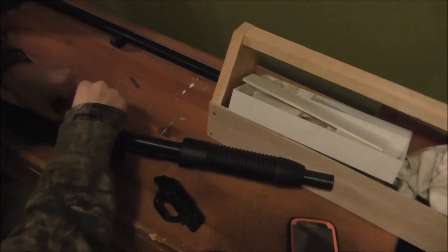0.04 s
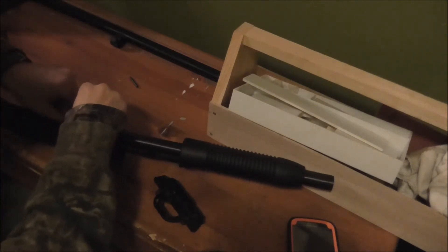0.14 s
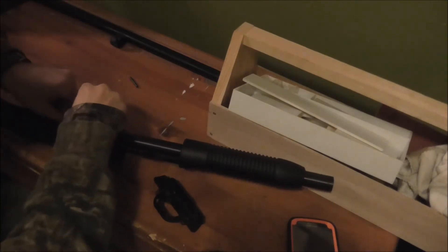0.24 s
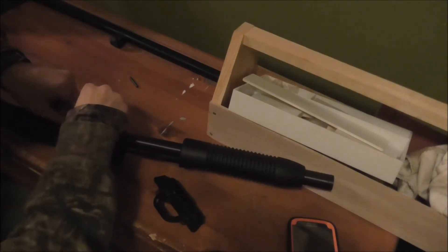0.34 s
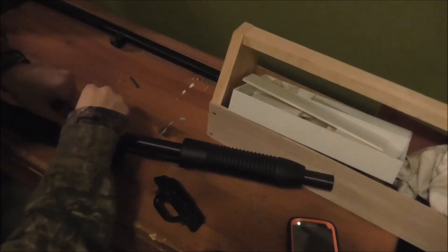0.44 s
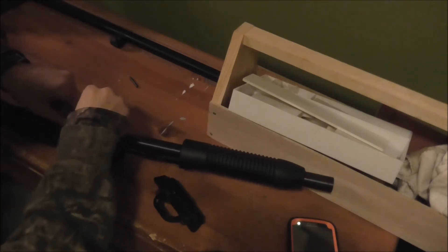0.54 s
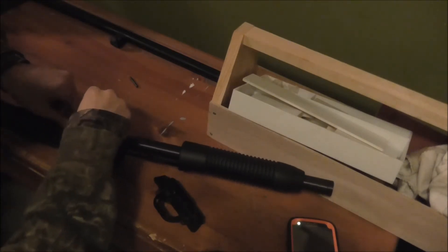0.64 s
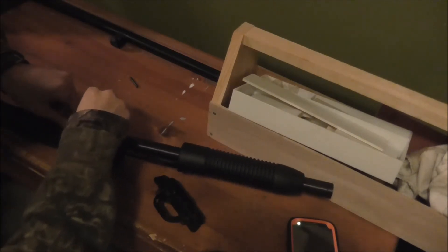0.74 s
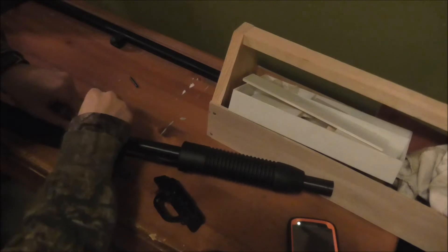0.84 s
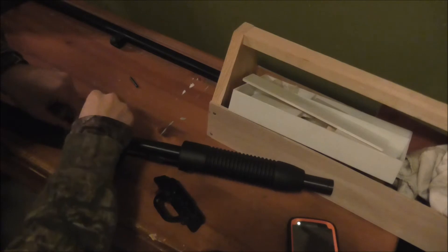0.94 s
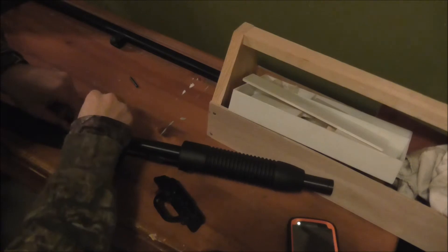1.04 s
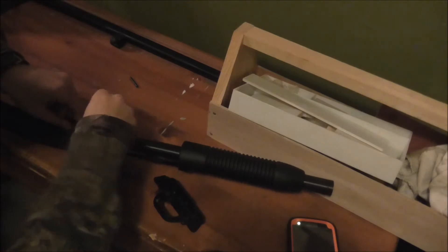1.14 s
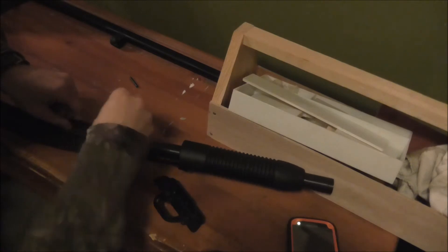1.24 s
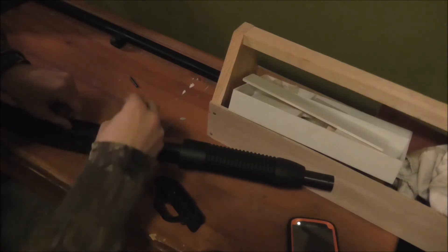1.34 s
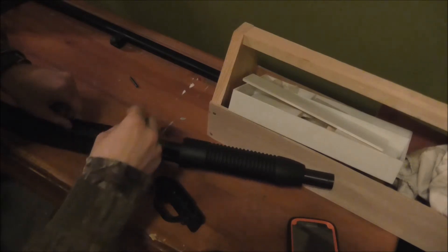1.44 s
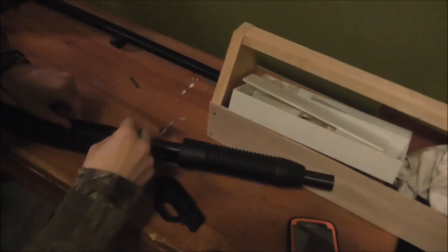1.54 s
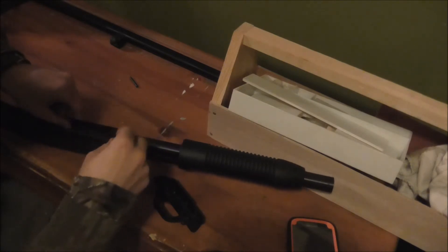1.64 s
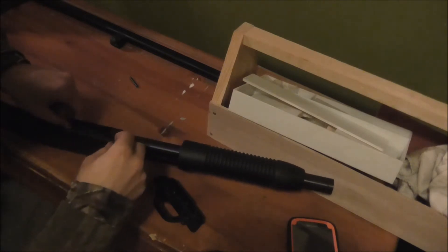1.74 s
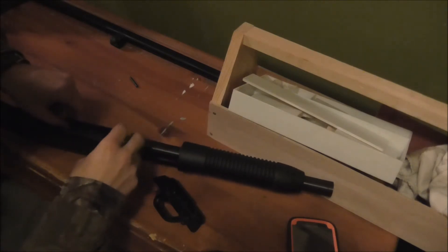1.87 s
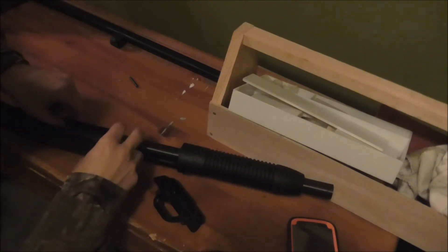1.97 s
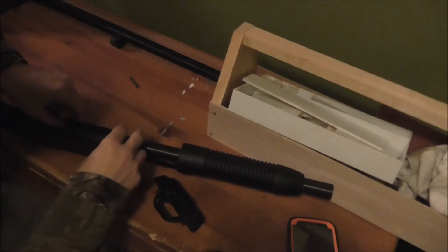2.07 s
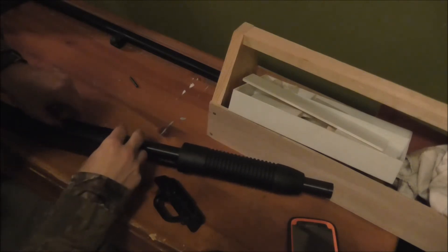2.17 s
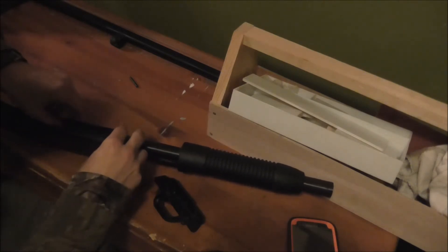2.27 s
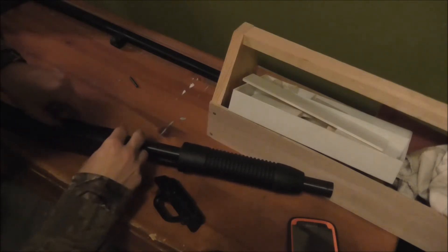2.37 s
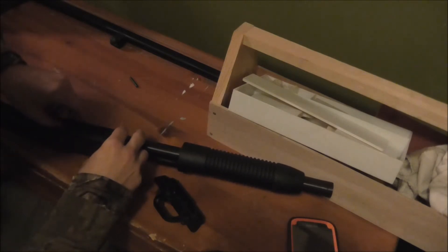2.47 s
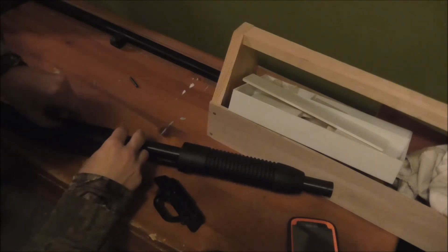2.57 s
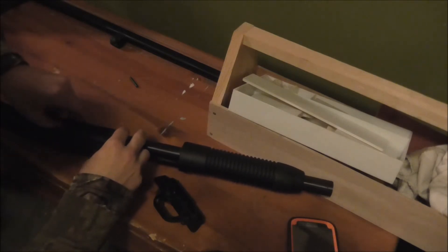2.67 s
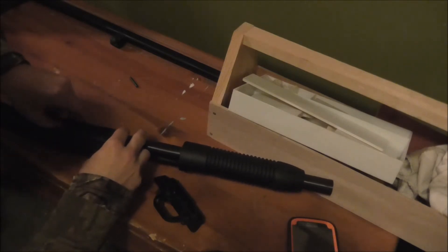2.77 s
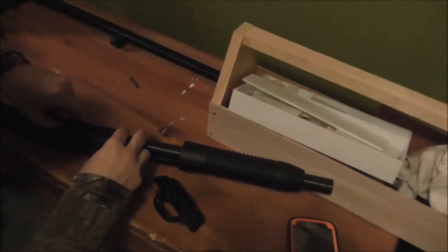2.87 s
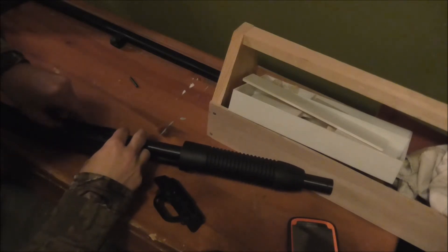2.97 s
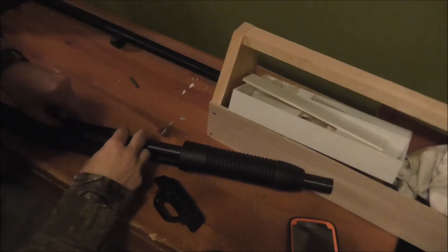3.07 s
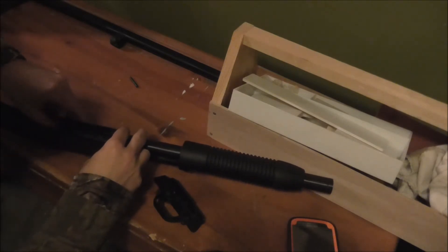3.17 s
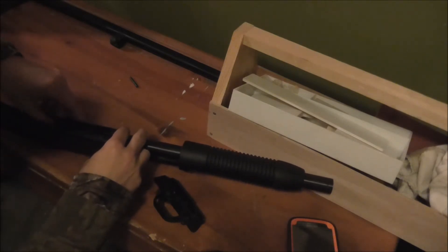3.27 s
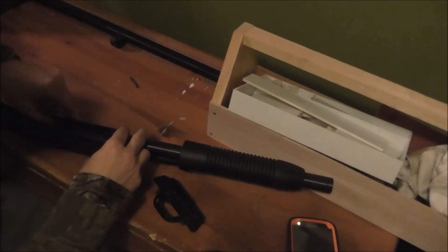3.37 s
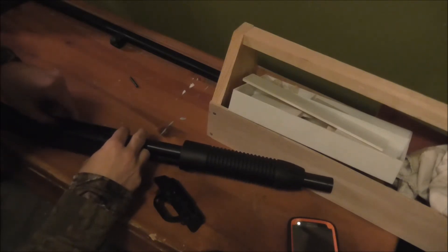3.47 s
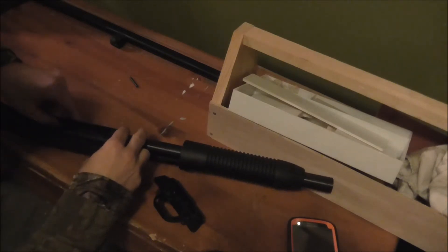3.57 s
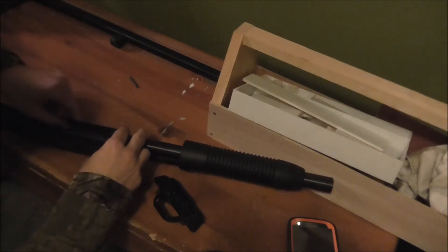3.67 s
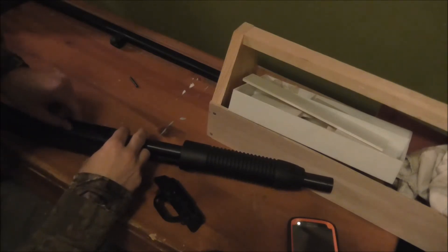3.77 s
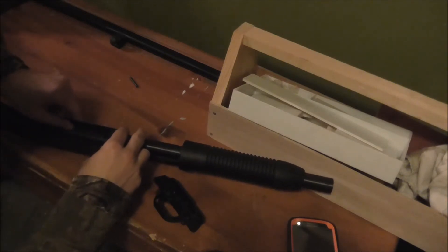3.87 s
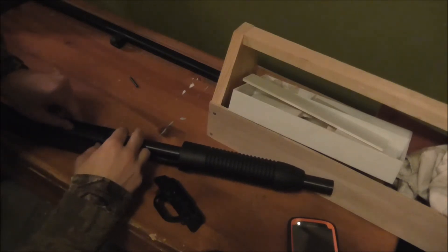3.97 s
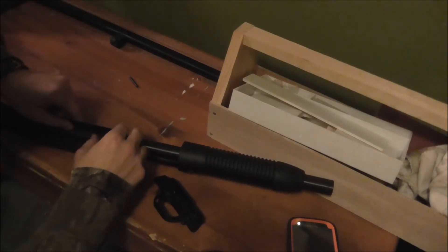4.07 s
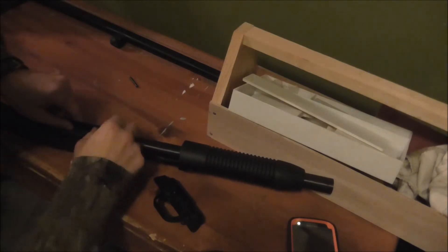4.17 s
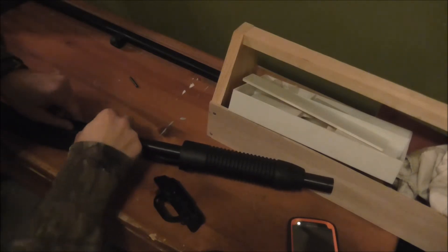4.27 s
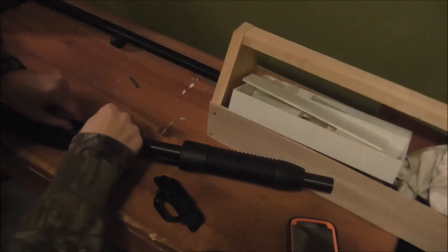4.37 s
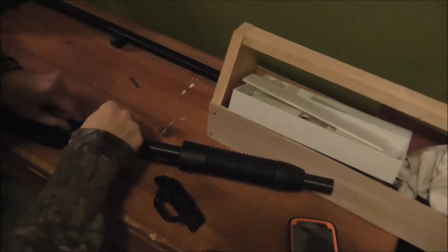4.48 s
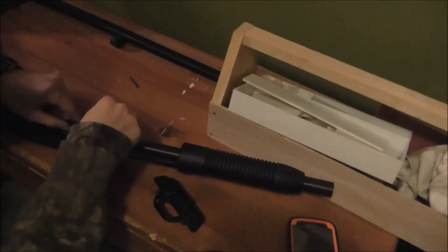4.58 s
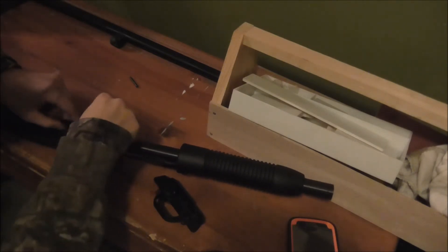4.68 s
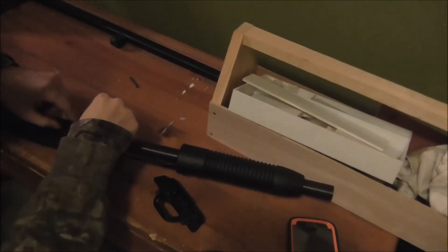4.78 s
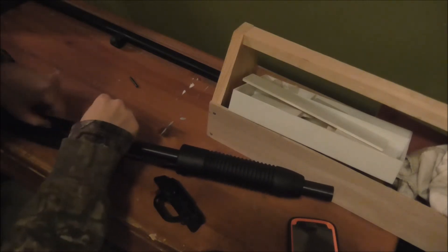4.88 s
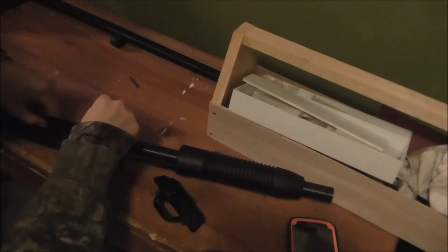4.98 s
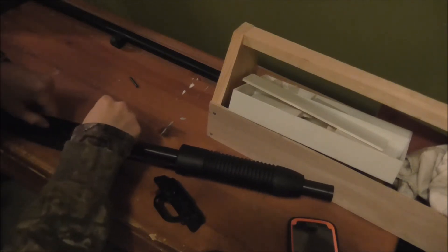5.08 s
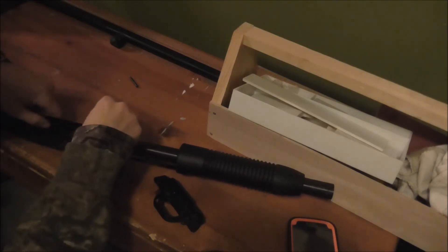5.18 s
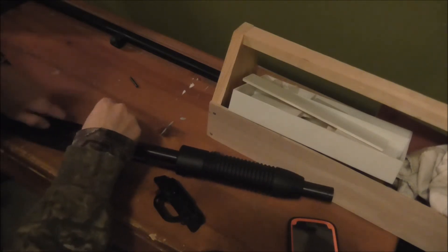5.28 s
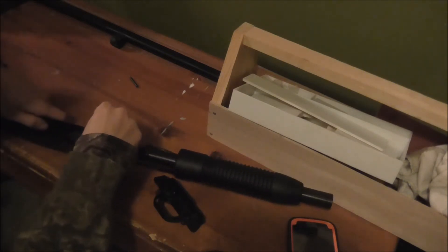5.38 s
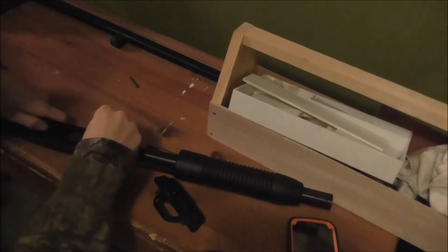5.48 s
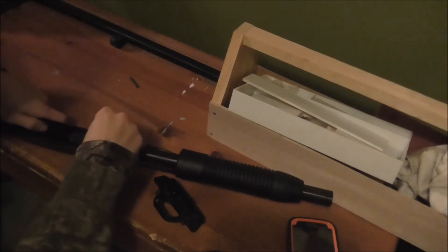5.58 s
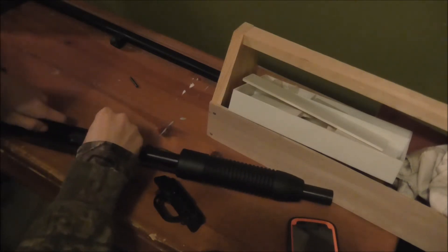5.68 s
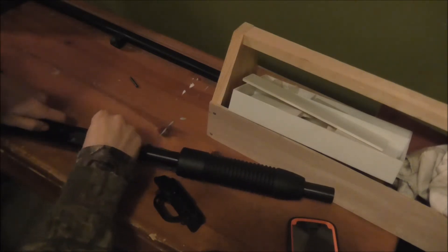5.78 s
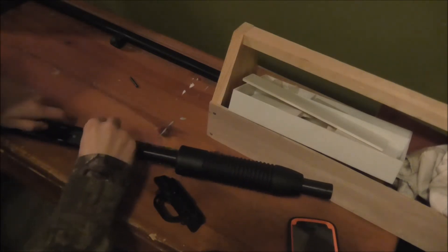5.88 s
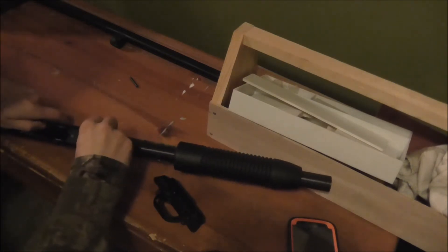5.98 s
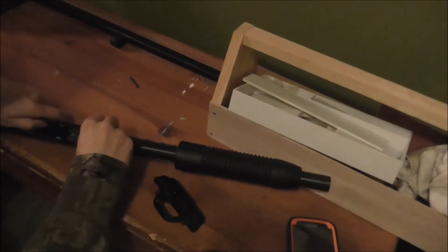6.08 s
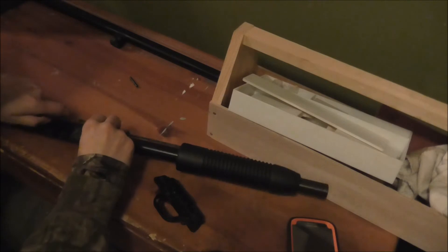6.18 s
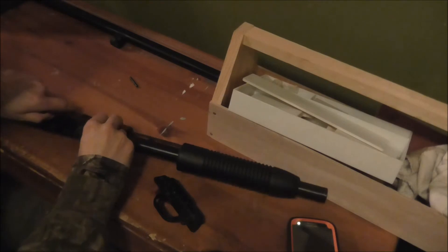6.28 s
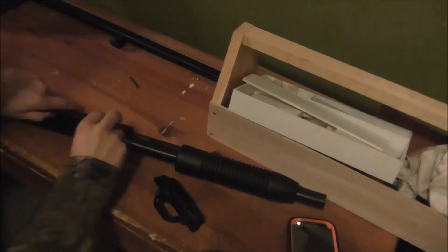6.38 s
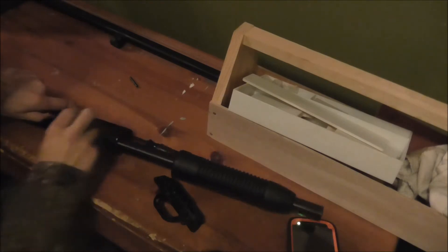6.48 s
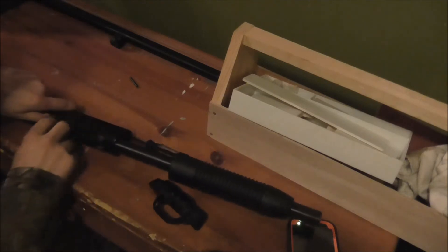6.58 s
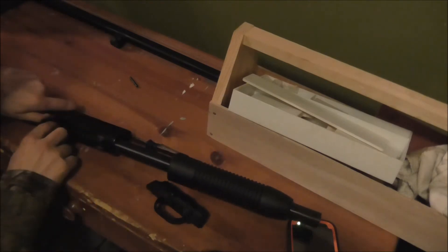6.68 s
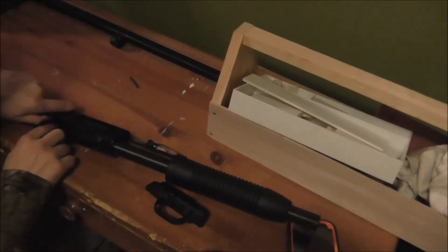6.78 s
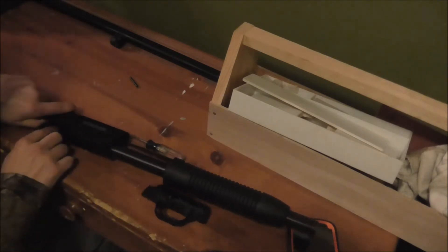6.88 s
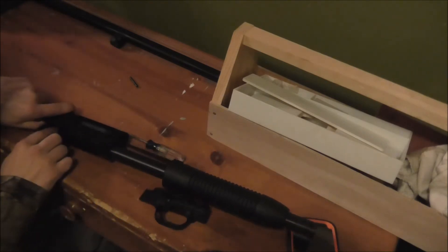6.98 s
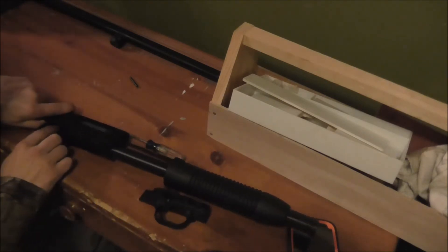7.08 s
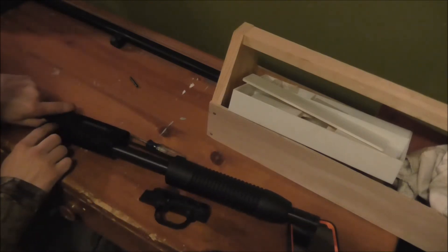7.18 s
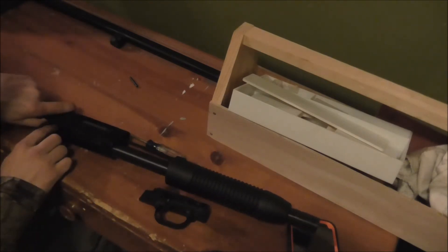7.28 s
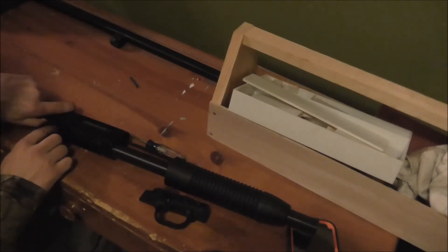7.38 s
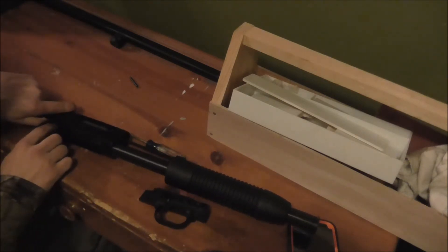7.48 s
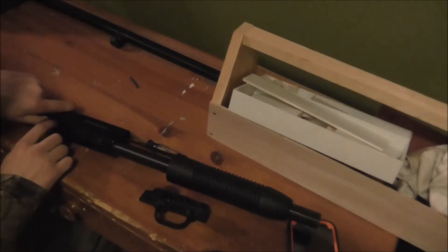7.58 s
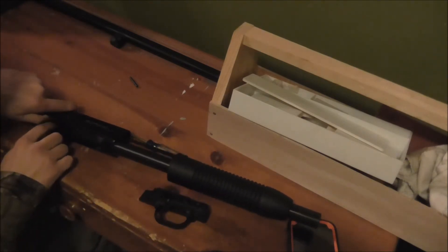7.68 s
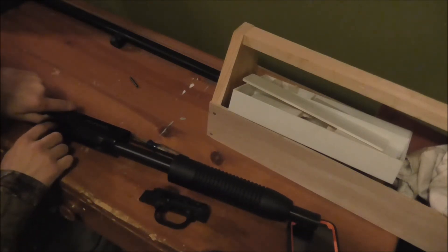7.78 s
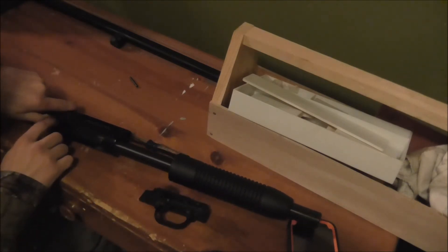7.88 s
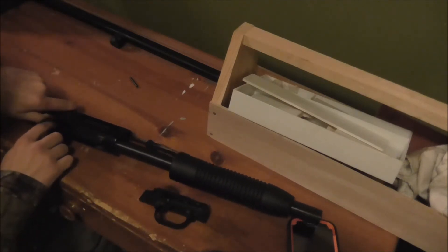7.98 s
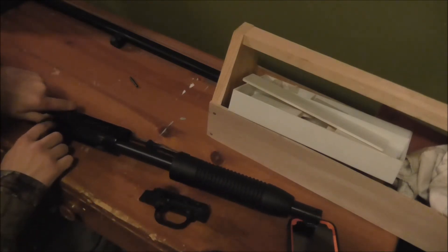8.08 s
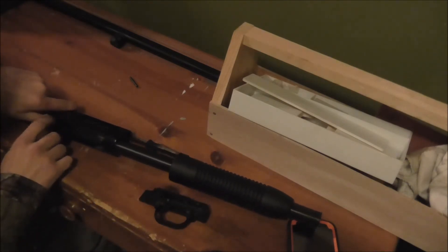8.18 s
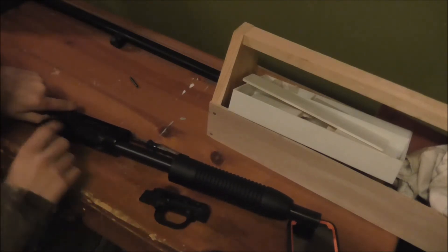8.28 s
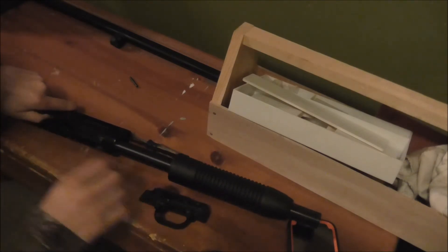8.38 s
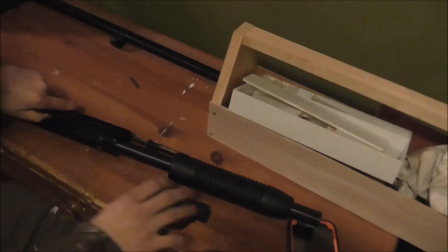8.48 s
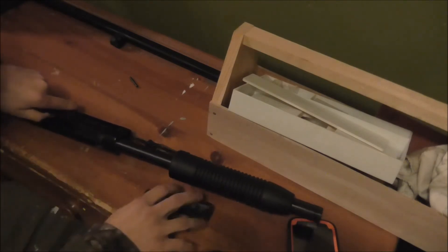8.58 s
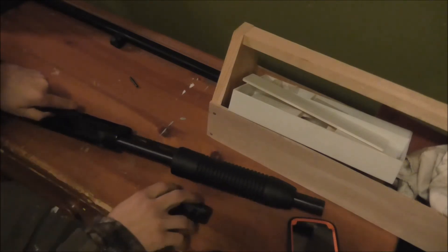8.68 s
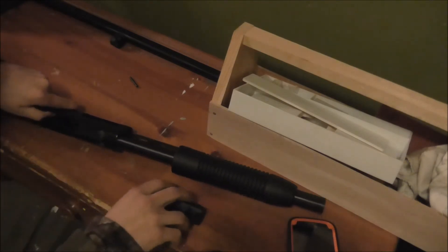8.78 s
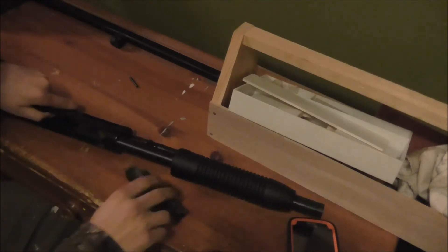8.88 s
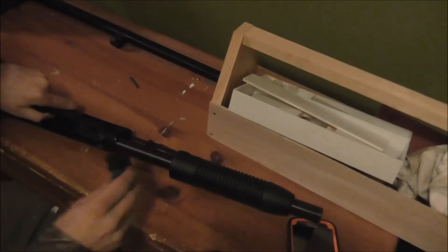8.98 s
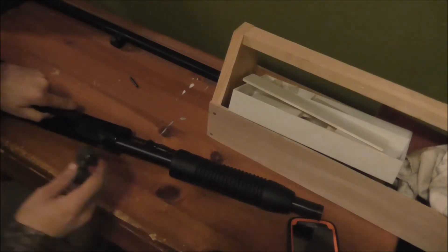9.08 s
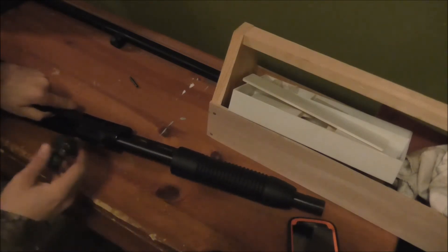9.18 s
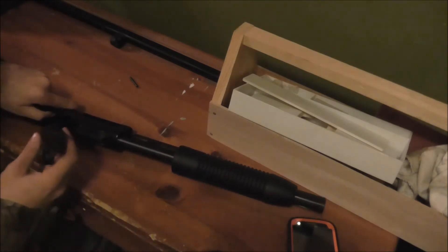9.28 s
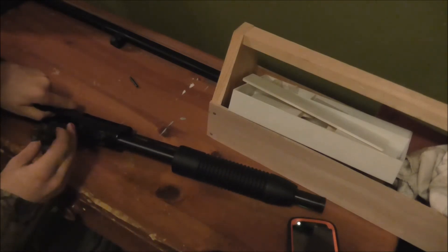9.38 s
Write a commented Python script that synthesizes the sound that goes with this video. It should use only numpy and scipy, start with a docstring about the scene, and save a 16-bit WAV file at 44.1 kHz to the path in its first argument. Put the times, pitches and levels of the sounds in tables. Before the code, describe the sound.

A shotgun is handled on a wooden table, heard close in a small room with a short echo and a steady, low electric hum. In the first second or so, small steel parts click sharply and scrape, leaving a faint ring. Fingers tap the stock at about 0.3 and 1.5 seconds. After a lull, more clicks and taps come between 3.2 and 4 seconds, then a few isolated ticks. From about 5.3 seconds a sleeve brushes softly and the gun begins to slide. Between 6.3 and 7.2 seconds comes a louder cluster of wooden knocks, low thuds, grainy sliding and clinks from a steel tube. The loose action then rattles in uneven metal clacks until about 8.3 seconds. Around 8.6 to 9 seconds a loose part knocks, bounces and slides on the table with a clink and small clicks, leaving only the hum.

```python
"""In a small room, on a wooden table, a shotgun is taken apart over a low electric hum.
Small steel pieces click and scrape, and the receiver (the gun's steel body) rings on faintly.
Fingers tap the wooden stock, a sleeve brushes by, and the gun and a loose part knock and slide on
the table. A steel tube clinks, and the action (the moving parts) rattles as the gun is turned.
Each hit sets off a few fading tones; each rub is a crowd of tiny slips."""
import sys
import numpy as np
from scipy import signal
from scipy.fft import rfft, irfft, next_fast_len
from scipy.io import wavfile

SR = 44100
rng = np.random.default_rng(int(sys.argv[2]) if len(sys.argv) > 2 else 0)


def file_out(sig):
    """Save sig as 16-bit WAV at sys.argv[1]."""
    # one column per channel
    cols = np.atleast_2d(sig).T
    # limit, then scale
    lim = np.clip(cols, -1, 1)
    pcm = np.round(lim * 32767).astype(np.int16)
    wavfile.write(sys.argv[1], SR, pcm)


N = 415863

# Levels are relative: the functions add their own gains. Brightness turns a hit's treble up or down.
# room air, and the hum's upper tones: f/Hz, level/dB
AIR_COLOUR = [(25, -20.5), (50, -14), (90, -20.5), (130, -4), (165, -15.5), (250, -9.5), (340, -17),
              (560, -15), (900, -20), (1700, -27.5), (2600, -38), (5000, -34), (9000, -40.5),
              (16000, -39.5)]
HUM_TONES = [(128, -65), (200, -64), (256, -65), (436, -67)]
# slow drift of the air and upper tones, and of the hum's lowest tone: t/s, level/dB
DRIFT = [(0, -11), (.3, 1.5), (1, -1.5), (2.5, 1.5), (4, 0.5), (9.4, 1)]
HUM_LEVEL = [(0.0, -64), (0.6, -56), (1.07, -58), (1.73, -52.5), (2.98, -53.5), (4.14, -59), (4.87, -56),
             (7.2, -56), (8.01, -57.5), (9.4, -55.5)]

# hits of small steel pieces, a loose part in the receiver, fingers on the stock and the tube:
# t/s, level/dB, brightness/dB
PIN_CLICKS = [(0.0, -33.5, -6), (0.006, -37, -8), (0.207, -48, -46), (0.685, -52.5, -16),
              (0.477, -50.5, -16), (0.483, -42.5, -52), (0.707, -64, -14), (0.7198, -27, -14),
              (0.9438, -41, -10), (0.9637, -32.5, -17), (0.974, -42, -26), (0.9795, -24.5, -32),
              (0.9826, -26.5, 4.5), (1.064, -35, -8), (1.069, -32.5, 5.5), (2.098, -48, -7),
              (3.19, -48.5, -47), (3.249, -40.5, -13), (3.2645, -42.5, -2), (3.281, -41.5, -5.5),
              (3.3762, -33, -14), (3.3817, -26, -2.5), (3.7479, -38, -14), (3.888, -45.5, -22),
              (3.9474, -30.5, 13), (4.4877, -52.5, -22), (4.7027, -36.5, -16), (5.4814, -35.5, -26.5),
              (5.996, -56, 5), (6.035, -54.5, -3), (6.112, -60, -1), (6.13, -61, -12.5), (8.722, -53, -20),
              (8.974, -54, -17), (9.002, -52, -10.5)]
ACTION_CLICKS = [(0.0, -47, -33), (5.992, -43, -32), (6.003, -43, -41), (6.317, -23, -21),
                 (6.534, -40, -56), (6.613, -36.5, -20), (6.821, -30, -27), (6.832, -26.5, -67),
                 (6.8372, -19.5, -30), (6.9072, -27.5, -9), (7.021, -32.5, -24), (7.0595, -39.5, -18),
                 (7.221, -38, -21), (7.3936, -32, -32), (7.4, -30.5, -24), (7.5033, -41, -8),
                 (7.6065, -41.5, -33), (7.9565, -35.5, -32), (8.0745, -44, -12), (8.2506, -33, -40),
                 (8.333, -41, -4.5), (8.6258, -41, -22), (8.646, -41.5, -11), (8.9381, -43, -14)]
TAPS = [(0.236, -46.5, -12), (0.349, -28.5, 6), (0.983, -65, 8), (1.067, -63.5, 16), (1.536, -22.5, -0.5),
        (1.5432, -31, 2.5), (3.253, -51, 2), (3.381, -53.5, 4), (3.5428, -29.5, -2), (3.8235, -28, -15.5),
        (3.863, -40.5, -7), (3.948, -56, 2)]
CLINKS = [(6.288, -20, -8.5), (6.302, -24, -6), (6.317, -30, -13), (6.8159, -36, -0.5), (6.906, -52, 12),
          (8.646, -31.5, -13), (8.655, -39, -9), (8.738, -51, -14)]
# gun and parts hit the table: t/s, level/dB, brightness/dB, number of bounces
KNOCKS = [(5.362, -52.5, -3, 0), (5.43, -51.5, 7.5, 0), (5.481, -39, -0.5, 0), (6.124, -55.5, 5.5, 0),
          (6.207, -44.5, -8, 0), (6.288, -25, -3.5, 0), (6.302, -21, -4, 1), (6.331, -32.5, 1, 0),
          (6.36, -27, -7.5, 0), (6.374, -36, -24, 0), (6.415, -32.5, -34, 0), (6.534, -22.5, -6, 0),
          (6.562, -34.5, -5.5, 0), (6.587, -25.5, -20, 0), (6.61, -22.5, -13, 0), (6.673, -26, -30, 0),
          (6.748, -28, -47, 0), (6.786, -35.5, -16.5, 0), (6.903, -26, -11.5, 0), (7.021, -25, -9.5, 0),
          (7.063, -25, -42, 0), (7.169, -25, -19.5, 0), (7.407, -51.5, 8, 0), (8.645, -22, 7, 2),
          (8.72, -27, -9.5, 1), (8.869, -40, -34, 0), (8.913, -28, -26, 0), (8.9388, -22.5, -2, 0),
          (8.961, -45, 14, 0), (8.984, -42.5, 13, 0)]
# the whole table gives: t/s, level/dB
THUDS = [(6.372, -39), (7.019, -43), (7.072, -48), (7.17, -52), (8.648, -36), (8.67, -44), (8.74, -57),
         (8.945, -50)]
# the action rocks between two stops:
# t/s, crossing time/s, first stop level/dB, second stop level/dB, brightness/dB, scrape level/dB
CLACKS = [(7.232, 0.011, -28.5, -31, 2, -30), (7.4065, 0.016, -21.5, -27, -25, -34),
          (7.6222, 0.014, -27, -27, -1.5, -32.5), (7.753, 0.011, -26.5, -16.5, -6, -35),
          (7.9799, 0.012, -25, -27, -1.5, -32), (8.069, 0.012, -35, -17, -3, -37),
          (8.2762, 0.015, -25, -31, -3.5, -30)]

# the tones each object rings with: f/Hz, level/dB, time to fade by 60 dB/s
PIN_TONES = [(1400, 2.5, 0.032), (1585, 13, 0.021), (1770, 8, 0.0059), (2200, -5, 0.0071), (2770, 1, 0.032),
             (2870, 3, 0.028), (3450, 0, 0.009), (4260, 0.5, 0.005), (5520, 4.5, 0.0063), (6050, 5, .009),
             (6880, -5.5, .008), (9000, 13, 0.0055), (9580, 12.5, 0.005), (9800, 4.5, 0.0049),
             (11360, 8, 0.0033), (12500, 9, 0.0033), (13750, 3, 0.004), (14700, 5, .004)]
ACTION_TONES = [(1470, -5, 0.0065), (1690, -2, 0.022), (1704, 4, 0.024), (1778, -5.5, 0.032),
                (2260, -9.5, 0.02), (2580, -3, 0.017), (3100, -7, 0.031), (3700, -7.5, 0.026),
                (4345, 4.5, 0.0092), (4470, -1.5, 0.004), (5300, -5.5, 0.0054), (5980, -12, 0.013),
                (6630, -9, .01), (8840, -3.5, 0.023), (10400, -15, 0.006), (12700, -6, 0.0082)]
RECEIVER_TONES = [(1440, -21, 0.3), (1720, -20, 0.32), (1840, -3.5, 0.27), (2830, -8, 0.153),
                  (3670, -15, 0.14), (4270, -29, 0.2), (4500, -19, 0.17), (5580, -21, 0.17),
                  (6050, -25, 0.2)]
STOCK_TONES = [(318, -5, 0.062), (392, -2.5, 0.072), (527, -5, 0.051), (556, 5, 0.055), (628, 3, 0.028),
               (780, 5.5, 0.032), (891, 1, 0.045), (974, -2.5, 0.034), (1190, -10, 0.044),
               (1340, -4.5, 0.046), (1640, -10.5, 0.018)]
TABLE_TONES = [(212, -18.5, 0.17), (220.8, -3, 0.16), (253.4, -9.5, 0.11), (322.3, -2, 0.13),
               (373, -8, 0.091), (419, -0.5, 0.066), (472, 0, 0.13), (514, -1, 0.1), (556, 0, 0.12),
               (650, -9, 0.033), (771, -6, 0.047), (878, -1.5, 0.061), (993, 1, 0.019), (1090, -3.5, 0.024),
               (1149, 0, 0.065), (1250, 1.5, 0.046), (1380, -1, 0.043), (1467, -4.5, 0.039),
               (1730, -13, 0.017)]
TUBE_TONES = [(1650, -3, 0.019), (2650, 11, 0.015), (4350, -17, 0.022), (4680, 7, 0.028), (4810, 0, 0.02),
              (5160, 7, 0.0095), (6300, -2, 0.011), (9140, -3, 0.0056), (10100, -2, 0.0067),
              (11350, -12, 0.008)]
# edges of four pitch bands, low to high: f/Hz
STEEL_BANDS = [1000, 2200, 3700, 7600, 16000]
WOOD_BANDS = [130, 420, 720, 1150, 2200]
# each object's strength in those four bands at zero brightness: level/dB
PIN_VOICE = [-2.5, -4, 3, 0.5]
ACTION_VOICE = [-1, -9.5, 0, 0]
STOCK_VOICE = [5.5, 9.5, -0.5, -10.5]
TABLE_VOICE = [1, 3, 1.5, -3.5]
TUBE_VOICE = [-8, -13, 1.5, -1]
# tone colour of the short burst as two surfaces meet: f/Hz, level/dB
STEEL_CRACK = [(300, -0.5), (950, -32.5), (1500, 7.5), (2300, 4.5), (4500, 1.5), (6800, 0.5), (7900, -11),
               (9200, -7.5), (12000, -3.5), (14000, -15), (16000, -25)]
STOCK_CRACK = [(80, -34.5), (250, -6.5), (550, -2.5), (900, 3), (1400, -11.5), (2300, -28), (5500, -34),
               (12000, -50.5)]
TABLE_CRACK = [(60, -6.5), (200, 0), (500, 12.5), (1150, -4.5), (1700, -5.5), (2400, -28.5), (5000, -23),
               (12000, -75)]
THUD_COLOUR = [(30, -28), (70, -6), (105, -5), (140, 2.5), (175, -1.5), (260, -36), (1000, -95),
               (16000, -100)]

# strokes of steel on steel, sleeve and palm on the gun, and gun on wood:
# peak t/s, level/dB, rise/s, fall/s
SCRAPES = [(0.0, -37.5, 0.02, 0.11), (0.73, -48.5, 0.066, 0.022), (0.96, -43, 0.041, 0.05),
           (1.08, -49, 0.045, 0.063), (3.27, -46, 0.028, 0.034), (5.94, -55, 0.18, 0.044),
           (6.0, -49, 0.012, 0.027), (6.13, -62, 0.01, 0.048), (6.22, -56, 0.018, 0.07),
           (6.705, -54, 0.0072, 0.018), (6.835, -58, 0.025, 0.023), (8.985, -48, 0.2, 0.034)]
BRUSHES = [(4.3, -69, 0.13, 0.15), (5.0, -69, 0.06, 0.06), (5.3, -64, 0.048, 0.037),
           (5.48, -54.5, 0.083, 0.067), (5.94, -52.5, 0.2, 0.22), (6.27, -52.5, 0.19, 0.43),
           (6.63, -57.5, 0.28, 0.26), (6.99, -62, 0.14, 0.5), (8.87, -60, 0.26, 0.36)]
SLIDES = [(5.95, -40.5, 0.37, 0.23), (6.25, -36.5, 0.12, 0.15), (6.4, -43, 0.46, 0.17),
          (6.57, -27.5, 0.014, 0.13), (6.79, -41, 0.23, 0.23), (6.95, -35.5, 0.039, 0.14),
          (7.1, -50, 0.08, 0.79), (8.74, -34, 0.23, 0.11), (8.87, -33, 0.38, 0.31),
          (8.98, -27, 0.11, 0.092)]
# tone colour of each kind of rubbing: f/Hz, level/dB
SCRAPE_COLOUR = [(30, -60), (150, -17), (400, -6), (1000, -16.5), (1400, 3), (1680, 2), (2050, 0),
                 (3400, -15), (4400, -6.5), (6500, -6), (7900, -15.5), (9100, -13), (12500, -22),
                 (16000, -36)]
BRUSH_COLOUR = [(500, -8), (1600, 9), (2800, -5), (4000, 0), (5100, 4), (6500, -4.5), (7900, -17),
                (9200, -5.5), (12000, -24), (16000, -30)]
SLIDE_COLOUR = [(50, -37), (110, -29), (200, 4.5), (315, 10.5), (400, 3), (520, 7.5), (700, 1.5),
                (1100, -8), (1600, -14), (2500, -41), (8000, -44), (16000, -64)]

# length of the room's echo: f/Hz, time to fade by 60 dB/s
ROOM_FADE = [(150, 0.24), (400, 0.19), (1000, 0.25), (2500, 0.25), (5000, 0.22), (9000, 0.2), (15000, 0.12)]
# tone colour of that echo: f/Hz, level/dB
ROOM_COLOUR = [(150, 6.5), (500, 2.5), (1000, 3.5), (1700, 0), (5000, 0.5), (9000, -2.5), (15000, 2)]
# "Mid" is the sound left and right share; "side" is what sets them apart.
# stereo width of the echo and of the air: f/Hz, side level against mid/dB
ROOM_WIDTH = [(60, -3), (150, -29), (400, -15), (900, -9), (2000, -7.5), (4500, -8), (7000, -9),
              (12000, -9.5)]
AIR_WIDTH = [(60, -29.5), (150, -10), (400, -5), (900, -4), (2000, 0), (12000, -9)]
# how much louder the left is than the right: f/Hz, level/dB
BALANCE = [(60, 1.0), (110, 0.5), (200, 0.5), (380, -1), (700, -1.5), (1290, 0), (2380, 2), (4400, 1),
           (8120, -0.5), (15000, -0.5)]
# how far the left wave runs ahead of the right: f/Hz, phase/rad
LEFT_LEAD = [(50, -0.39), (350, -0.22), (900, -0.34), (1900, -0.41), (3000, -0.53), (7400, 0.69),
             (9400, 0.82), (12000, 1), (13500, 0.97), (16000, .2)]


def amp(db):
    """Turns decibels into a gain."""
    return 10 ** (np.asarray(db) / 20)


def unit(x):
    """Scales a signal to an average power of one."""
    return x / np.sqrt(np.mean(x ** 2) + 1e-20)


def read(points, hz):
    """Looks up a curve between its listed frequencies."""
    f, value = np.transpose(points)
    return np.interp(np.log(hz + 1), np.log(f + 1), value)


def add(mix, s, sound):
    """Mixes a sound in at s seconds."""
    part = mix[max(round(s * SR), 0):][:len(sound)]
    part += sound[:len(part)]


def colour(x, points):
    """Gives a signal a tone colour."""
    size = next_fast_len(len(x), True)
    gain = amp(read(points, np.fft.rfftfreq(size, 1 / SR)))
    return irfft(rfft(x, size) * gain, size)[:len(x)]


def pulse(points, size=1024):
    """The sharpest click that has this tone colour."""
    log_gain = np.log(amp(read(points, abs(np.fft.fftfreq(size, 1 / SR)))))
    return np.fft.ifft(np.exp(np.conj(signal.hilbert(log_gain)))).real[:size // 2]


def wander(hz):
    """A smooth random wobble, up to about hz times a second."""
    smooth = signal.resample_poly(rng.standard_normal(1000), 8, 1)
    return unit(np.interp(np.arange(N) / SR * hz * 2 * 8, np.arange(len(smooth)), smooth))


def band_levels(rows, voice, bend):
    """Four band levels for each hit: harder surfaces lift the upper bands more."""
    share = np.linspace(0, 1, len(voice)) ** bend
    return [(s, db + np.array(voice) + bright_db * share) for s, db, bright_db in rows]


def strikes(hits, tones, crack, bands, *, energy_s, touch_s, chatter, crack_db, spread_db, detune,
            grit_db, grit_s, low_hz, size, order=3):
    """Each hit pushes and chatters against an object, which rings with its own fading tones."""
    t, out = np.arange(size) / SR, np.zeros(N)
    hz, db, fade_s = np.transpose(tones)[:, :, None]
    filters = [signal.butter(3, band, "band", fs=SR, output="sos") for band in zip(bands, bands[1:])]
    tick, touch = pulse(crack), t / touch_s
    push = np.arange(size) == np.argmax(touch > .1)
    for s, levels in hits:
        weight = amp(db + spread_db * rng.standard_normal(hz.shape)) * rng.choice([-1, 1], hz.shape)
        pitch = hz * (1 + detune * rng.standard_normal(hz.shape))  # the grip shifts the tones a little
        ring = (weight * amp(-60 * t / fade_s) * np.sin(2 * np.pi * pitch * t)).sum(0)
        # the surfaces meet in a short swell, then settle in tiny rebounds
        swells = rng.standard_normal((2, size)) * touch * np.exp(-touch ** 2)
        rebounds = (rng.random(size) < 600 / SR) * rng.standard_normal(size) * np.exp(-t / grit_s)
        shake, rub = ((unit(swell) + amp(grit_db) * unit(rebounds)) / np.sqrt(size) for swell in swells)
        ringing = signal.fftconvolve(push + chatter * shake, ring)[:size]
        burst = signal.fftconvolve(rub, tick)[:size]
        sound = unit(ringing) + amp(crack_db) * unit(burst)
        # aim each band at the energy of its level held for energy_s
        powers = [np.sum(signal.sosfilt(sos, sound) ** 2) / (energy_s * SR) for sos in filters]
        gains_db = levels - 10 * np.log10(powers)
        curve = [(low * (high / low) ** place, gain)
                 for low, high, gain in zip(bands, bands[1:], gains_db) for place in (0.2, 0.8)]
        add(out, s, signal.fftconvolve(sound, pulse(curve)))
    bass_cut = signal.butter(order, low_hz, "high", fs=SR, output="sos")  # small things give little bass
    return signal.sosfilt(bass_cut, out)


def friction(strokes, spectrum, slips_per_s, slip_db, uneven_db, roundness):
    """Many tiny slips under uneven pressure; each stroke swells to a peak and dies away."""
    t, power = np.arange(N) / SR, np.zeros(N)
    drop_db = 28  # below the peak, one rise time before it and one fall time after
    for s, db, rise_s, fall_s in strokes:
        away = np.maximum((s - t) / rise_s, (t - s) / fall_s)
        near = away < 2
        power[near] += amp(db - drop_db * abs(away[near]) ** roundness) ** 2
    slips = (rng.random(N) < slips_per_s / SR) * rng.standard_normal(N)
    slips *= amp(slip_db * np.minimum(rng.exponential(1, N), 2))
    pressure = amp(uneven_db * np.tanh(wander(30)))
    return np.sqrt(power) * unit(colour(slips, spectrum)) * pressure


def air_and_hum(hum_hz=63.7):
    """Room air from all around and a wavering electric hum; the level of both dips and slowly recovers. Gives
    mid and side."""
    t = np.arange(N) / SR
    drift_db = np.interp(t, *np.transpose(DRIFT))
    air_gain = amp(-55 + 0.57 * drift_db)
    air, air_side = (air_gain * unit(colour(noise, AIR_COLOUR)) for noise in rng.standard_normal((2, N)))
    tones = [(hum_hz, 0.5 + np.interp(t, *np.transpose(HUM_LEVEL)))]
    tones += [(hz, db + drift_db) for hz, db in HUM_TONES]
    hum = np.zeros(N, complex)
    for hz, db in tones:
        waver = (hz / 220) ** 2 * wander(5.9)  # higher tones waver more
        hum += amp(db) * np.sqrt(2) * np.exp(1j * (2 * np.pi * hz * t + waver))
    return np.array([air + hum.real, colour(air_side, AIR_WIDTH) + amp(-24.5) * hum.imag])


def pin_clicks():
    """Small steel pieces skid for an instant as they snap home."""
    hits = band_levels(PIN_CLICKS, PIN_VOICE, bend=1.64)
    return amp(-0.1) * strikes(
        hits, PIN_TONES, STEEL_CRACK, STEEL_BANDS, energy_s=0.004, touch_s=0.0023, chatter=3.9,
        crack_db=-2, spread_db=2, detune=0.012, grit_db=-22.5, grit_s=0.008, low_hz=259, size=3072)


def action_rattle():
    """The loose action ticks and clacks against the inside of the receiver."""
    hits = band_levels([*ACTION_CLICKS, *clack_hits()], ACTION_VOICE, bend=2.7)
    return strikes(
        hits, ACTION_TONES, STEEL_CRACK, STEEL_BANDS, energy_s=0.0032, touch_s=0.0012, chatter=4,
        crack_db=-7.5, spread_db=2.5, detune=0.008, grit_db=-10, grit_s=0.0071,
        low_hz=1190, order=4, size=3072)


def receiver_ring(clicks, size=16000, count=11, spacing=0.008):
    """The receiver picks up each click and rings on; each tone is a cluster of close pitches."""
    t, ring = np.arange(size) / SR, np.zeros(size)
    for hz, db, fade_s in RECEIVER_TONES:
        decay = np.log(1000) / fade_s
        fade = amp(db) * 2 * decay / SR * np.exp(-decay * t)
        steps = np.arange(count) - count // 2 + rng.uniform(-1.1, 0.65, count)
        for pitch in hz * (1 + spacing * steps):
            ring += fade * np.sin(2 * np.pi * (pitch * t + rng.random()))
    return signal.oaconvolve(clicks, ring)[:N]


def steel_scrapes(rise_s=0.017, fall_s=0.024):
    """Small pieces drag on steel, and the action drags on its rails, loudest at the second stop."""
    drags = [(s + crossing_s, db, rise_s, fall_s) for s, crossing_s, *_, db in CLACKS]
    return amp(2) * friction([*SCRAPES, *drags], SCRAPE_COLOUR,
                             slips_per_s=3200, slip_db=0.5, uneven_db=7, roundness=1)


def stock_taps():
    """Fingers tap the stock, and the wood rings faintly."""
    hits = band_levels(TAPS, STOCK_VOICE, bend=0.56)
    return amp(-1.8) * strikes(
        hits, STOCK_TONES, STOCK_CRACK, WOOD_BANDS, energy_s=0.0066, touch_s=0.0034, chatter=0.3,
        crack_db=-13, spread_db=-0.3, detune=0.0089, grit_db=-15, grit_s=0.012, low_hz=287, size=12000)


def sleeve_brushes():
    """Sleeve and palm rub softly over the gun as the arm moves."""
    return amp(0.5) * friction(BRUSHES, BRUSH_COLOUR,
                               slips_per_s=2000, slip_db=0, uneven_db=1.5, roundness=1.48)


def table_knocks(bounce_s=0.0143, jitter_s=0.00071, bounce_gain_db=0.5, duller_db=18):
    """Gun and parts knock on the table top; a few bounce, duller each time."""
    rows = []
    for s, db, bright_db, bounces in KNOCKS:
        for k in range(round(bounces) + 1):
            rows.append((s, db + k * bounce_gain_db, bright_db - k * duller_db))
            s += bounce_s + jitter_s * rng.standard_normal()
    hits = band_levels(rows, TABLE_VOICE, bend=1)
    return strikes(
        hits, TABLE_TONES, TABLE_CRACK, WOOD_BANDS, energy_s=0.012, touch_s=0.0025, chatter=0.61,
        crack_db=0, spread_db=1.5, detune=0.0083, grit_db=-8.5, grit_s=0.017,
        low_hz=176, order=7, size=8000)


def table_slides():
    """The gun or a part slides over the wood with a low, grainy rub."""
    return amp(-6) * friction(SLIDES, SLIDE_COLOUR,
                              slips_per_s=1600, slip_db=3.5, uneven_db=2.5, roundness=1.28)


def tube_clinks():
    """The steel tube rings briefly when it is jolted."""
    hits = band_levels(CLINKS, TUBE_VOICE, bend=2)
    return strikes(
        hits, TUBE_TONES, STEEL_CRACK, STEEL_BANDS, energy_s=0.0051, touch_s=0.0018, chatter=0.77,
        crack_db=-12.5, spread_db=3.5, detune=0.005, grit_db=2, grit_s=0.0072, low_hz=1200, size=4096)


def table_thuds(energy_s=0.024):
    """The whole table gives once under a heavy knock: a short, low push."""
    push, out = pulse(THUD_COLOUR, size=8192), np.zeros(N)
    push *= np.sqrt(energy_s * SR / np.sum(push ** 2))
    for s, db in THUDS:
        add(out, s, amp(db) * push)
    return out


def clack_hits(graze_s=0.0035, settle_s=0.025, duller_db=5):
    """The action rocks from one stop to the other, touching four times."""
    for s, crossing_s, first_db, second_db, bright_db, _ in CLACKS:
        yield s, first_db - 5.5, bright_db  # grazes the first stop
        yield s + graze_s, first_db, bright_db  # hits it
        yield s + crossing_s, second_db, bright_db - duller_db  # hits the second stop
        yield s + settle_s, first_db - 20, bright_db - duller_db  # settles


def room(x, early_db, tail_db, first_s, direct=1, size=22050):
    """Quick echoes off table and wall, then a furnished room's short tail; gives mid and side."""
    t = np.arange(size) / SR

    def echoes(per_s):
        return rng.standard_normal((2, size)) * (rng.random((2, size)) < per_s / SR) * (t > first_s)

    hz, age_s, spectra = signal.stft(echoes(5000), SR, nperseg=128)
    spectra *= amp(read(ROOM_COLOUR, hz)[:, None] - 60 * age_s / read(ROOM_FADE, hz)[:, None])
    tails = signal.istft(spectra, SR, nperseg=128)[1][:, :size]
    earlies = echoes(3000) * np.exp(-t / 0.0048)
    responses = [(amp(early_db) * unit(early) + amp(tail_db) * unit(tail)) / np.sqrt(size)
                 for early, tail in zip(earlies, tails)]
    mid, side = (signal.oaconvolve(x, response)[:N] for response in responses)
    return np.array([direct * x + mid, colour(side, ROOM_WIDTH)])


def scene():
    """All the sounds in the room, heard at two close points, left and right."""
    pins, action, tube = pin_clicks(), action_rattle(), tube_clinks()
    ring = receiver_ring(amp(-12.5) * pins + amp(-15) * action + amp(7) * tube)
    # each click throws a different sound toward the walls, heard only as echo
    thrown = pin_clicks() + amp(-3) * action_rattle()
    mix = room(thrown, early_db=-17, tail_db=-12.5, first_s=0.0085, direct=0)
    mix += room(pins, early_db=-8, tail_db=-21.5, first_s=0.0025)
    mix += room(action + tube + ring, early_db=-13.5, tail_db=-15.5, first_s=0.0064)
    mix += room(stock_taps(), early_db=-17, tail_db=-11.5, first_s=0.01)
    mix += room(table_knocks() + table_thuds(), early_db=-9, tail_db=-9, first_s=0.006)
    rubbing = table_slides() + steel_scrapes() + sleeve_brushes()
    mix += room(rubbing, early_db=-5.5, tail_db=-8, first_s=0.0091)
    mid, side = mix + air_and_hum()
    hz = np.fft.rfftfreq(N, 1 / SR)
    lean = amp(read(BALANCE, hz) / 2) * np.exp(.5j * read(LEFT_LEAD, hz))  # half for each channel
    return np.array([irfft(rfft(mid + side) * lean, N), irfft(rfft(mid - side) / lean, N)])


def record(dry, top_hz=16200):
    """Cuts away the very highest treble."""
    treble_cut = signal.firwin(511, top_hz, window=("kaiser", 9), fs=SR)
    return signal.oaconvolve(dry, treble_cut[None], "same")


dry = scene()
out = record(dry)
file_out(out)
```